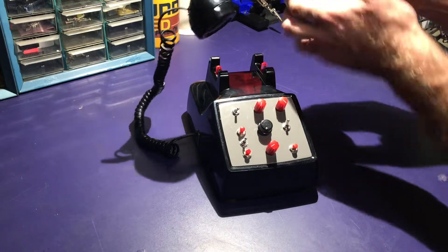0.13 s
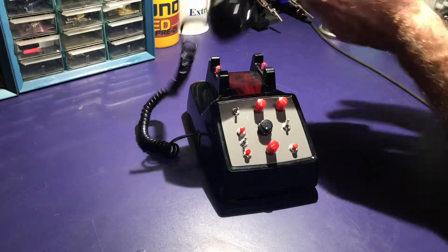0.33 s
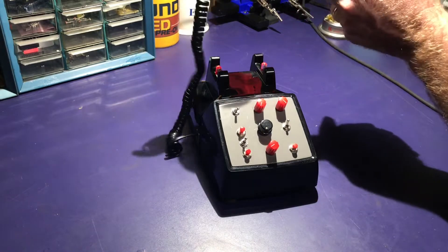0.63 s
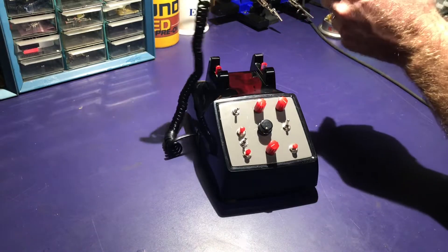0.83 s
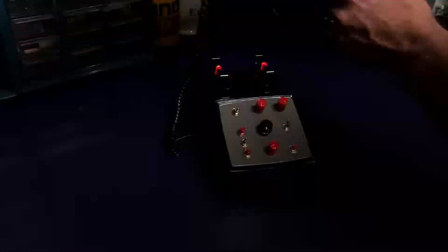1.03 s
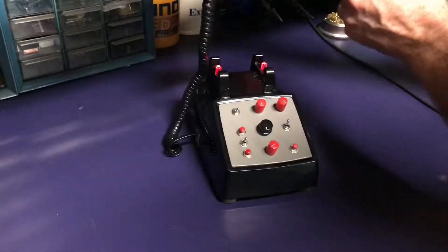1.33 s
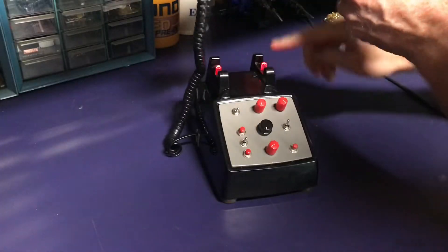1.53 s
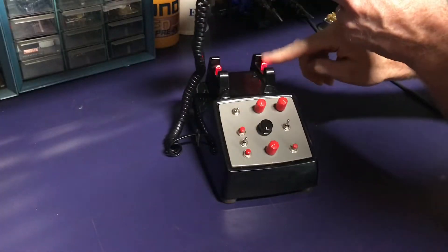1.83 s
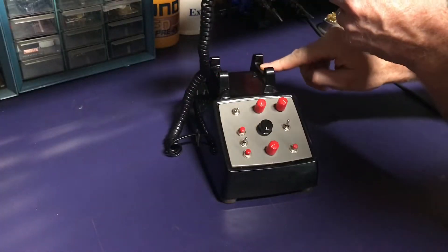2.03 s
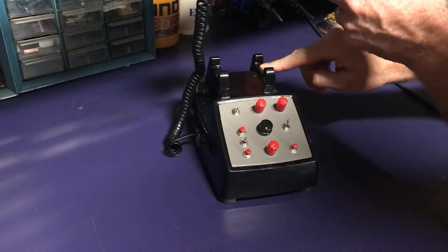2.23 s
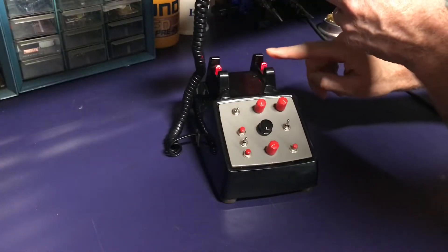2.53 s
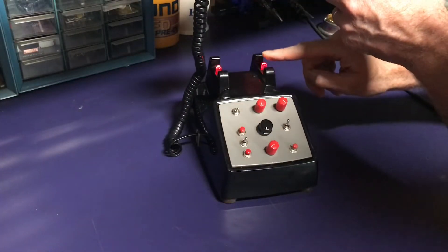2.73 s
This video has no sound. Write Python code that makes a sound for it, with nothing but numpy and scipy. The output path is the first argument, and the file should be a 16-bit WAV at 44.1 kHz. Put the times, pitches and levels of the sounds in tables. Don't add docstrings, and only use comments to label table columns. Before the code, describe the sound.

Hard plastic clack of a vintage telephone being lifted, followed by light rattles and plunger clicks over low hum

```python
import sys
import numpy as np
from scipy import signal
from scipy.io import wavfile

SR = 44100
rng = np.random.default_rng(int(sys.argv[2]) if len(sys.argv) > 2 else 0)


def to_linear_factor(level_db):
    exponent = np.asarray(level_db, float) / 20
    return 10 ** exponent


def to_wav(sig):
    pcm = np.clip(np.atleast_2d(sig), -1, 1) * 32767
    pcm = np.round(pcm).astype(np.int16)
    wavfile.write(sys.argv[1], SR, pcm.T)


N = 127890


def rms_one(x):
    return x / np.sqrt(np.mean(x ** 2) + 1e-20)


def curve(rows):
    s, db = np.transpose(rows)
    return to_linear_factor(np.interp(np.arange(N) / SR, s, db))


def ring(x, hz, t60):
    radius = to_linear_factor(-60 / (max(t60, .001) * SR))
    turn = 2 * np.pi * hz / SR
    return signal.lfilter([0, np.sin(turn)], [1, -2 * radius * np.cos(turn), radius * radius], x + 1e-18)


def band(x, low_hz, high_hz):
    return signal.sosfilt(signal.butter(2, [low_hz, min(high_hz, .45 * SR)], "band", fs=SR, output="sos"), x)


def low_cut(x, hz):
    return signal.sosfilt(signal.butter(2, hz, "high", fs=SR, output="sos"), x)


def narrow_noise(hz, width_hz):
    t60 = np.log(1000) / np.pi / width_hz
    return rms_one(ring(rng.standard_normal(N + SR), hz, t60)[-N:])


def coloured_noise(spectrum, patchy_db):
    hz, db = np.transpose(spectrum)
    white = rng.standard_normal((2, N + SR // 2))
    edges = 22 * 2 ** np.arange(0, 10, .5)
    out = 0
    for k, (low, high) in enumerate(zip(edges, edges[1:])):
        points = rng.standard_normal(N // 600 + 2)
        flicker = np.interp(np.arange(N) / 600, np.arange(len(points)), points)
        level_db = np.interp(np.log(low * high) / 2, np.log(hz), db, left=db[0] - 21.0)
        out = out + to_linear_factor(level_db + patchy_db * flicker) * band(white[k % 2], low, high)[-N:]
    return rms_one(out)


def knocks(events, modes, thump_db, cut_share):
    chatter_per_s, contact_s, treble_shorter = 12000, 0.00027, 0.32
    colour_width_oct, struck_cycles = 1, 16
    struck_part_db, crack_db, treble_roll_hz = -3.5, -5, 14500
    size = SR // 5
    t = np.arange(size) / SR
    out = np.zeros((2, N + size))
    for s, db, centre_hz, t60, treble_db in events:
        chance, force = rng.random((2, size))
        luck = rng.normal(0, 2, 14)
        hits = (chance < chatter_per_s / SR) * (2 * force - 1) * np.minimum(t / contact_s + 0.39, 1)
        decay_db = -60 * t / np.clip(t60, .004, .3)
        bright = hits * to_linear_factor(decay_db / treble_shorter)
        hits = hits * to_linear_factor(decay_db)

        body = 0
        for (hz, level_db, ring_s), chance_db in zip(modes, luck):
            near = np.exp(-.5 * (np.log2(hz / centre_hz) / colour_width_oct) ** 2)
            weight = near + to_linear_factor(treble_db) * (hz > centre_hz)
            body = body + weight * to_linear_factor(level_db + chance_db) * ring(hits, hz, ring_s)
        part = ring(hits, centre_hz, struck_cycles / centre_hz)
        rings = rms_one(body) + to_linear_factor(struck_part_db) * rms_one(part)

        crack = band(hits, centre_hz / 2, centre_hz * 2)
        crack = crack + to_linear_factor(treble_db) * band(bright, min(centre_hz * 2, 7000), treble_roll_hz)
        sound = np.array([rings, to_linear_factor(crack_db) * rms_one(crack)])

        knee_hz = min(2.9 * centre_hz, 9000)
        sound = low_cut(sound, cut_share * centre_hz)
        above = to_linear_factor(treble_db / 2) * band(sound, knee_hz, SR)
        sound = band(sound, cut_share * centre_hz, knee_hz) - above
        thump = band(hits, 120, 230) + band(hits, 420, 620)
        sound[1] += to_linear_factor(thump_db) * rms_one(thump)

        i = max(int(s * SR), 0)
        out[:, i:i + size] += to_linear_factor(db) * sound / np.max(np.abs(sound.sum(axis=0)))
    return out[:, :N]


# [f/Hz, level/dB]
SHOP_SPECTRUM = [(15, -54), (25, -27), (43, -9), (66, -1), (108, -22.5), (236, -21), (439, -33.5),
                 (1790, -41), (16000, -56)]
# [f/Hz, width/Hz, level/dB]
MACHINE_DRONES = [
    (67.55, 8.9, -50.5),
    (142, 70, -58),
    (239, 18, -68),
    (12800, 100, -87.5),
]


def workshop():
    fade = to_linear_factor(-1.4 * np.arange(N) / SR)
    drones = sum(to_linear_factor(db) * narrow_noise(hz, width) for hz, width, db in MACHINE_DRONES)
    return to_linear_factor(-55.5) * coloured_noise(SHOP_SPECTRUM, patchy_db=1.0) + fade * drones


# [t/s, level/dB]
HAND_MOVES = [(0, -49), (.2, -60.5), (.45, -61.5), (.62, -60), (.67, -70.5), (.7, -61.5), (.76, -65.5),
              (.8, -78.5), (1.05, -63.5), (1.25, -69.5), (1.4, -68.5), (1.6, -77), (2.1, -79), (2.9, -73.5)]
# [f/Hz, level/dB per Hz]
RUSTLE_SPECTRUM = [(300, 5), (700, 6), (1600, -1), (3000, -2), (6000, -5.5), (10000, -14.5), (15500, -6.5)]


def hand_rustle():
    return curve(HAND_MOVES) * coloured_noise(RUSTLE_SPECTRUM, patchy_db=-0.5)


# [t/s, level/dB]
EARPIECE_SWELL = [(0, -74.5), (.3, -68.5), (.6, -61.5), (.8, -80), (1.3, -68), (1.45, -66.5), (1.7, -76),
                  (1.9, -81.5), (2.9, -93)]


def earpiece_hiss():
    return curve(EARPIECE_SWELL) * narrow_noise(1635, 55)


# [t/s, peak level/dB, colour centre f/Hz, chatter t60/s, treble level/dB]
LIFT_KNOCKS = [
    (0.0, -37.5, 5500, 0.24, -17),
    (0.013, -25, 2009, 0.14, -10.5),
    (0.019, -27.5, 3500, 0.39, -3.5),
    (0.0226, -2, 2000, 0.053, 4),
    (0.0238, 2, 6010, 0.021, 1),
    (0.028, -1, 4810, 0.032, -11.5),
]
# [f/Hz, level/dB, t60/s]
CRADLE_MODES = [(560, 10, .04), (855, 2, 0.05), (1057, 8, 0.018), (1470, -3.5, .025), (1700, -3, .018),
                (1880, -1.5, .02), (1920, 5.5, .02), (2320, -1, .015), (2790, -3.5, 0.019),
                (4400, -8, 0.0074), (5150, -2.5, 0.016), (5700, -3.5, 0.0088), (6150, -3.5, .012),
                (8556, -3, .006)]


def lift():
    return knocks(LIFT_KNOCKS, CRADLE_MODES, thump_db=-19, cut_share=0.21)


def room(x):
    gap_s, t60_s, top_t60_s, split_hz = 0.0013, 0.24, 0.11, 2900
    t = np.arange(SR // 2) / SR
    white = rng.standard_normal((2, len(t))) * np.clip(t / gap_s - 1, 0, 1)
    tail = band(white[0], 120, split_hz) * to_linear_factor(-60 * t / t60_s)
    tail = tail + band(white[1], split_hz, 11000) * to_linear_factor(-60 * t / top_t60_s)
    return to_linear_factor(-9) * signal.fftconvolve(x, tail / np.sqrt(np.sum(tail ** 2)))[:N]


# [t/s, f/Hz, level/dB, t60/s]
PART_BUZZES = [(1.096, 8700, -54.5, 0.26), (1.096, 11770, -41.5, 0.1), (1.169, 8500, -54, 0.052),
               (2.439, 8690, -54, 0.051), (2.488, 8430, -50, 0.074), (.0145, 13400, -46, 0.039),
               (.027, 8300, -25.5, 0.078), (.714, 2620, -54.5, 0.09), (.844, 2530, -45.5, 0.076),
               (1.097, 3490, -33, 0.026), (1.996, 3650, -55.5, .07), (2.041, 3700, -64, .1),
               (2.454, 4400, -42, .1)]


def pings():
    t = np.arange(N) / SR
    out = 0
    for s, hz, db, t60 in PART_BUZZES:
        decay = to_linear_factor(db - 60 * np.clip(t - s, 0, 1) / t60) * (t > s)
        out = out + decay * narrow_noise(hz, 400)
    return out


# [t/s, peak level/dB, colour centre f/Hz,
# chatter t60/s, treble level/dB]
BENCH_THUDS = [(.023, -21, 183, 0.023, -30.5), (.026, -22.5, 560, 0.034, -33),
               (.027, -20.5, 1057, 0.035, -31.5), (.516, -41, 658, 0.01, -30),
               (1.053, -49.5, 635, 0.035, -26), (1.074, -45.5, 1600, 0.07, -25),
               (2.428, -47, 620, 0.085, -25), (2.5, -32.5, 990, 0.021, -23),
               (1.42, -51.5, 700, 0.017, -24.5), (1.46, -55, 700, 0.021, -26),
               (1.997, -41.5, 180, 0.045, -35), (2.045, -50, 213, 0.056, -30),
               (.553, -48.5, 1120, 0.077, -15), (.582, -49, 810, 0.04, -15), (.606, -48.5, 1290, .06, -14),
               (.63, -51, 901, 0.047, -17)]
# [f/Hz, level/dB, t60/s]
BASE_MODES = [(150, 0, .05), (196, 0, 0.028), (430, -6.5, 0.036), (530, -4, .04), (648, 0.5, .04),
              (720, -3.5, .03), (944, -4.5, .03), (1057, 0, 0.12), (1600, 4, 0.022)]


def thuds():
    return knocks(BENCH_THUDS, BASE_MODES, thump_db=-32.0, cut_share=0.32)


# [f/Hz, level/dB, t60/s]
SPRING_MODES = [(690, -7, .6), (867, -8, .45), (1486, -11, .45), (1771, -2, .75), (1778, -11, .6),
                (2207, -8, .45), (2606, -9, .75)]
# [t/s, level/dB, extra level of the top spring/dB]
SPRING_STRIKES = [
    (0.025, -53, 17),
    (2.49, -54, 0),
]


def springs():
    out = 0
    for hz, level_db, t60 in SPRING_MODES:
        clicks = np.zeros(N)
        for s, db, top_db in SPRING_STRIKES:
            is_top = hz == SPRING_MODES[-1][0]
            clicks[int(s * SR)] = to_linear_factor(db + level_db + top_db * is_top)
        out = out + ring(clicks, hz, t60)
    return out


# [start t/s, length t/s, level/dB]
CORD_RUBS = [(0.678, .03, -66.5), (0.701, 0.068, -62), (1.23, 0.066, -69), (1.343, .02, -65),
             (0.304, .03, -63), (0.425, .04, -65.5)]
# [f/Hz, width/Hz, level/dB]
FRICTION_TONES = [(5260, 340, -4), (6600, 300, -1), (9600, 290, -1), (11700, 310, -1), (14400, 500, -4)]


def rubbing():
    t = np.arange(N) / SR
    stroke = 0
    for s, length, db in CORD_RUBS:
        stroke = stroke + to_linear_factor(db) * np.sin(np.pi * np.clip((t - s) / length, 0, 1)) ** 1.2
    hiss = sum(to_linear_factor(db) * narrow_noise(hz, width) for hz, width, db in FRICTION_TONES)
    return stroke * rms_one(hiss)


# [t/s, peak level/dB, colour centre f/Hz, chatter t60/s, treble level/dB]
RAISE_TICKS = [(.329, -45, 5200, 0.028, -4), (.424, -49.5, 2645, 0.049, -3),
               (.516, -34.5, 868, 0.028, -2.5), (.713, -44.5, 2415, 0.03, -27),
               (.7135, -39, 1000, 0.033, -30), (.726, -42.5, 960, 0.011, -24), (.79, -50, 980, 0.044, -7.5),
               (.821, -39.5, 1063, 0.052, -45), (.8435, -31, 2760, 0.042, -28),
               (.969, -40.5, 1980, 0.12, -6), (1.077, -43.5, 4000, 0.074, -29.5),
               (1.088, -29, 1630, 0.12, -12), (1.0958, -25, 3450, 0.062, 0.5),
               (1.169, -40.5, 3360, 0.033, 2), (1.247, -45, 2040, 0.49, -4), (1.267, -31, 3770, 0.053, -37),
               (1.289, -19.5, 2100, 0.094, -3)]
# [f/Hz, level/dB, t60/s]
HANDSET_MODES = [(700, 1.5, 0.03), (1020, -0.5, 0.015), (1700, -5, 0.029), (2000, -6, 0.022),
                 (2580, 1.5, 0.026), (3090, 3, 0.011), (3650, -0.5, 0.0073), (4260, 7.5, 0.0063),
                 (5010, 8.5, 0.0049), (5763, -6.5, 0.015), (6650, -17.5, .008), (8500, 0, 0.0062),
                 (12630, -2, 0.0042)]


def ticks():
    return knocks(RAISE_TICKS, HANDSET_MODES, thump_db=-28.5, cut_share=0.38)


# [t/s, peak level/dB, colour centre f/Hz, chatter t60/s, treble level/dB]
PLUNGER_KNOCKS = [(1.744, -49.5, 1480, 0.027, -8), (1.809, -43.5, 2900, 0.07, -22),
                  (1.930, -31, 3220, 0.064, -15), (1.941, -30.5, 1098, 0.058, -4),
                  (1.9935, -47, 12900, 0.021, -12.5), (1.995, -47, 3760, 0.051, -33.5),
                  (2.0, -45.5, 690, 0.068, -29), (2.038, -53.5, 12700, .04, 0),
                  (2.04, -54.5, 3170, 0.13, -25), (2.064, -50, 870, 0.026, -16),
                  (2.43, -51, 2080, 0.072, -21), (2.439, -35.5, 3420, 0.21, -5.5),
                  (2.447, -40.5, 12800, 0.033, -15), (2.456, -31, 3670, 0.095, -47),
                  (2.472, -23, 2450, 0.029, -16), (2.4872, -28.5, 1890, 0.09, -7),
                  (2.4965, -31.5, 1550, 0.035, -10), (2.503, -30, 1020, 0.019, -7.5),
                  (2.487, -41, 14500, 0.034, -8), (2.509, -34.5, 1700, 0.014, -37),
                  (2.462, -38.5, 4400, 0.046, -34), (2.4785, -54, 2200, 0.036, -25),
                  (2.001, -44, 1860, 0.059, -29), (2.043, -67, 3800, .06, -25),
                  (1.948, -34.5, 1830, 0.027, -25), (2.775, -59.5, 2000, .03, -17)]
# [f/Hz, level/dB, t60/s]
HOUSING_MODES = [(620, 3.5, 0.066), (945, 5, 0.027), (1593, -35, 0.016), (1902, -0.5, 0.019),
                 (2023, -9.5, 0.044), (2900, 2.5, 0.0032), (3570, -15, 0.014), (4400, 1.5, 0.0036),
                 (5500, -18, 0.0079), (8500, -23.5, 0.011), (13030, -1, 0.0046), (14710, 1, 0.0054)]


def plunger():
    return knocks(PLUNGER_KNOCKS, HOUSING_MODES, thump_db=-16.5, cut_share=0.21)


def scene():
    rings, cracks = lift() + thuds() + ticks() + plunger()
    echoes = room(to_linear_factor(-7) * rings + cracks)
    phone = rings + cracks + echoes + springs() + pings()
    hand = hand_rustle() + rubbing()
    return (phone + hand + earpiece_hiss() + workshop())[None]


def band_limit(x):
    return signal.sosfilt(signal.butter(12, 16610, fs=SR, output="sos"), x)


def record(dry):
    rounded = .93 * np.tanh(dry / .93)
    mix = signal.sosfilt(signal.cheby2(12, 22, 15950, fs=SR, output="sos"), rounded)
    return band_limit(mix)


dry = scene()
out = record(dry)
to_wav(out)
```